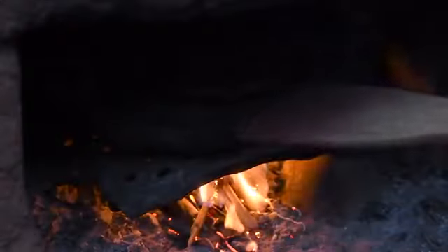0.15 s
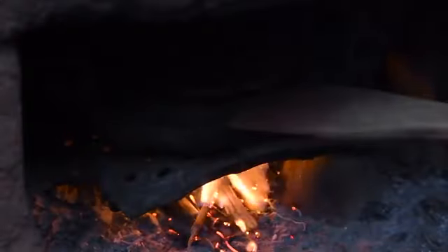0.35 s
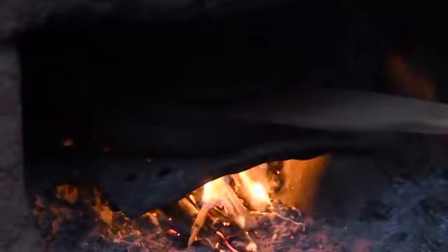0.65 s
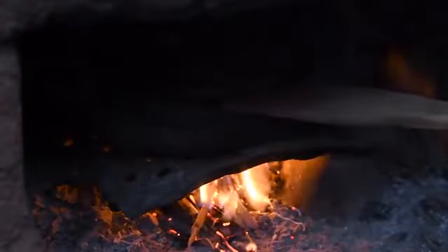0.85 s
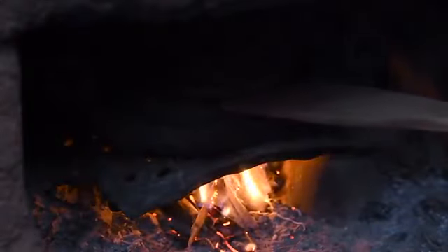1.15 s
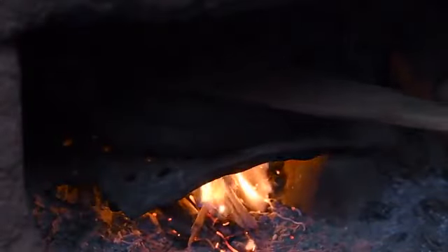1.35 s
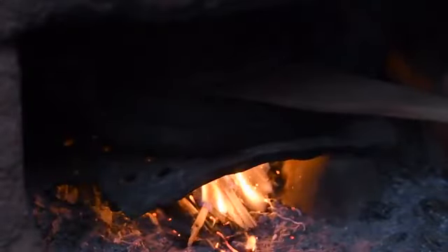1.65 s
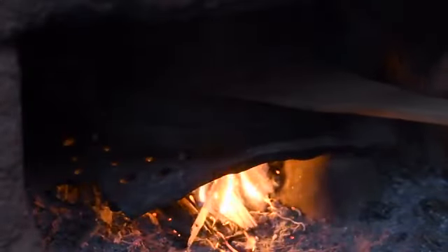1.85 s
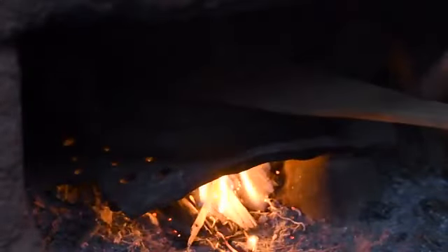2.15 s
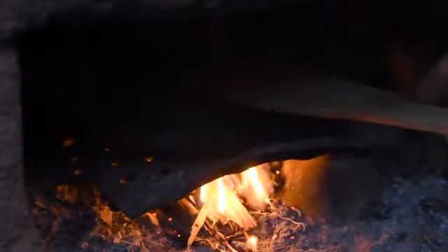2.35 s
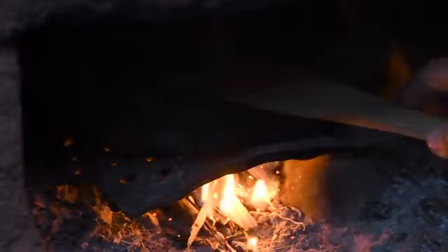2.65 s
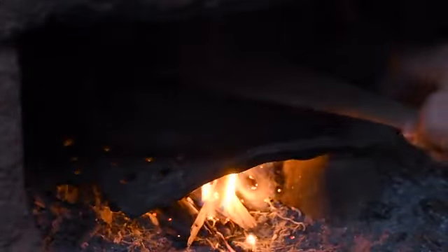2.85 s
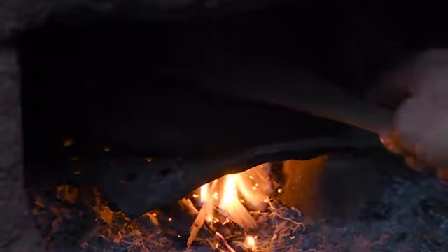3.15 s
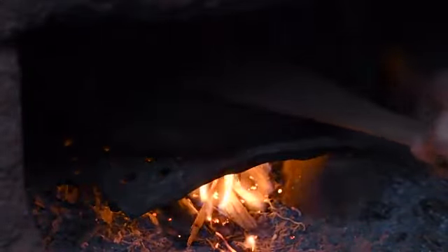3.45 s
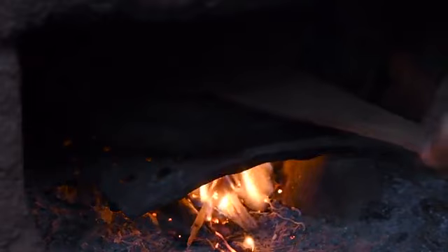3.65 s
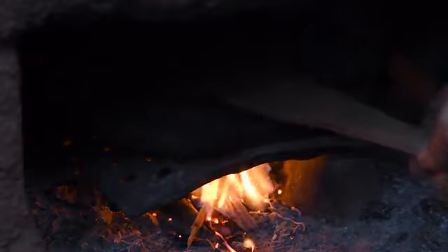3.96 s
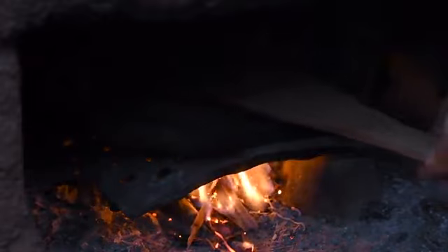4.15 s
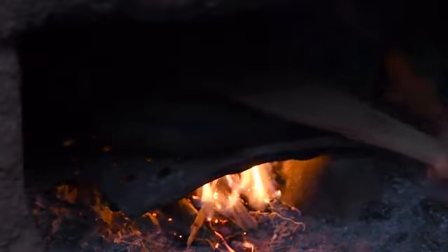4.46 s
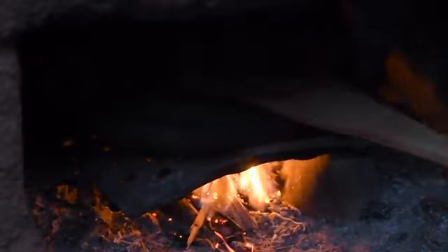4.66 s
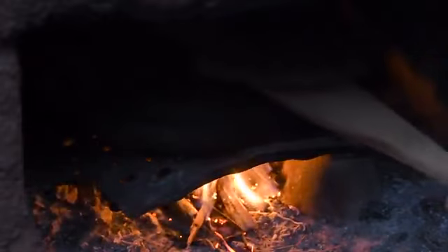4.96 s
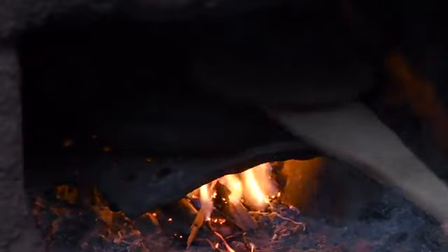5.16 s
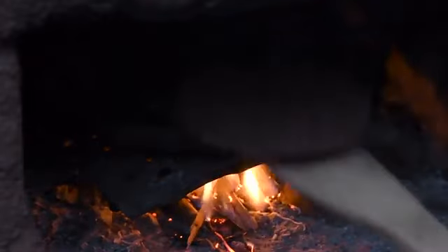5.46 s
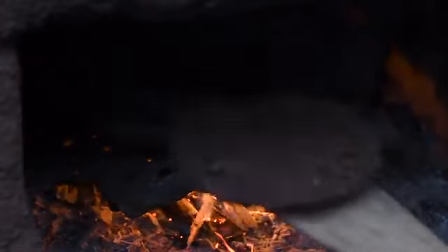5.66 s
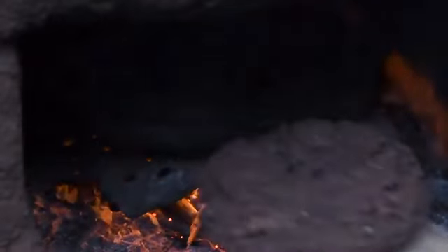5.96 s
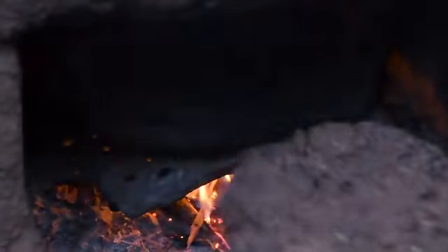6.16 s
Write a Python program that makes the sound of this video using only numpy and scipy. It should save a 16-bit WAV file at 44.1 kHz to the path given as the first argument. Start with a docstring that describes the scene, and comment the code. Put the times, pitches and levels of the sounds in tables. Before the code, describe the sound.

A constant low outdoor rumble with soft air and thin hiss lies beneath close, dry sounds of a wooden spatula on an iron griddle. Around 0.4 s comes a light scrape with a faint knock, then a sharp snap at 0.8 s. The hardest crack, with a gritty jab, lands at 1.36 s, followed by smaller catches to 1.5 s. Short jabs return at 1.9 and 2.1 s; from 2.4 to 4 s scratchy pushes come closer together, with a snap at 2.8 s and a tiny high squeak at 3.9 s. Strong quick rasps burst at 4.05-4.27 s with a dull knock, fading by 4.5 s. A faint distant engine drone climbs from 1.3 to 3.3 s; a higher, steadier one passes briefly at 4.9-5.9 s. Barely audible fire ticks fall at 4.7, 5.6 and 6.1 s, leaving rumble until about 6.3 s.

```python
"""A wooden spatula is worked under a flatbread on a hot iron griddle in a clay hearth: noise bursts through
the blade's resonances make short jabs and longer gritty scrapes, and its edge catches on baked-on crust with
sharp snaps, a brief squeak and dull griddle knocks. Decaying noise makes a few faint ticks of the wood fire.
Outdoors, filtered noise gives a steady low rumble, airy top and thin hiss; wavering sines give a far engine
drone climbing in pitch, then a shorter, higher and steadier one."""
import sys
import numpy as np
from scipy import signal
from scipy.fft import rfft, irfft, next_fast_len
from scipy.io import wavfile
from scipy.ndimage import uniform_filter1d, map_coordinates

SR = 44100
rng = np.random.default_rng(int(sys.argv[2]) if len(sys.argv) > 2 else 0)


def generate_wav(sig):
    """Save sig (samples, or channels by samples) to the path in sys.argv[1] as 16-bit PCM at SR."""
    pcm = np.round(np.clip(np.atleast_2d(sig).T, -1, 1) * 32767).astype(np.int16)
    wavfile.write(sys.argv[1], SR, pcm)


N = 278561

# Resonances that colour every scrape and snap. Each row: centre in Hz, width in Hz, lift in dB.
FIXED_MODES = [(453, 48, 5.5), (760, 69, -3), (1220, 110, 3.5), (1953, 150, 4), (3480, 140, 4),
               (3927, 81, 5.5), (5010, 83, 3.5), (7240, 170, -3), (7700, 100, 2.5), (10100, 100, 1.5),
               (11900, 150, 5)]
# Left-right likeness of the hearth sounds. Each row: frequency in Hz, coherence from 0 to 1.
NEAR_COHERENCE = [(400, 0.9), (1400, 1), (2600, 1), (4500, 0.69), (9000, 0.75), (14000, 0.92)]
RING_WIDTH_HZ = 350  # of the blade's strongest resonance


def amp(db):
    """Decibels to gain."""
    return 10 ** (np.asarray(db) / 20)


def unit(x):
    """Scale to rms 1."""
    return x / np.sqrt(np.mean(x ** 2) + 1e-20)


def along(points, hz):
    """Join (Hz, value) points on a log-frequency axis."""
    f, v = np.transpose(points)
    return np.interp(np.log(hz + 1), np.log(f + 1), v)


def curves(rows):
    """One value per sample for each column after the time."""
    s, *cols = np.transpose(rows)
    return [np.interp(np.arange(N) / SR, s, c) for c in cols]


def during(start_s, end_s, fade_s=0.0056):
    """1 between two times and 0 outside, with soft edges."""
    t = np.arange(N) / SR
    return np.clip(.5 + np.minimum(t - start_s, end_s - t) / fade_s, 0, 1)


def wobble(rate_hz):
    """A smooth random curve with rate_hz knots a second."""
    knots = rng.standard_normal(int(N * rate_hz / SR) + 4)
    return map_coordinates(knots, [np.arange(N) * rate_hz / SR])


def filtered(x, response):
    """Apply a complex response of frequency, with zero padding."""
    n = x.shape[-1]
    m = 2 * next_fast_len(n // 2 + 4096)
    return irfft(rfft(x, m) * response(np.fft.rfftfreq(m, 1 / SR)), m)[..., :n]


def causal(db):
    """Minimum-phase response with these gains: it rings only after it is struck."""
    cepstrum = irfft(np.log(amp(db)))
    half = len(cepstrum) // 2
    return np.exp(rfft(np.r_[cepstrum[0], 2 * cepstrum[1:half]], 2 * half))


def lift(modes, hz):
    """Summed gain in dB of resonances given as (Hz, width Hz, dB)."""
    return sum(db / (1 + (2 * (hz - centre) / width) ** 2) for centre, width, db in modes)


def noise_pair(n, coherence):
    """Stereo noise whose mid-side mix sets the left-right coherence."""
    def mid_side_gains(hz):
        angle = np.arccos(np.clip(along(coherence, hz), -1, 1)) / 2
        return np.array([np.cos(angle), np.sin(angle)])

    mid, side = filtered(rng.standard_normal((2, n)), mid_side_gains)
    return np.array([mid + side, mid - side])


def background(rumble_db=-44.5, swell_db=-0.13, hiss_db=-67):
    """A steady low rumble, nearly alike in both ears, with an airy top that slowly eases, under a thin hiss."""
    # Each row: frequency in Hz, density in dB per Hz.
    rumble_spectrum = [(12, -26), (22, -9.5), (38, -4.5), (60, -1.5), (120, -0.5), (160, -7), (195, -10),
                       (240, -10.5), (310, -18), (420, -26.5), (700, -36.5), (2000, -73)]
    # Each row: frequency in Hz, density in dB per Hz.
    air_spectrum = [(150, -17), (400, 5.5), (500, -2.5), (580, 3.5), (700, -0.5), (1050, -1.5),
                    (1500, -9.5), (2200, -15), (5000, -36)]
    # Each row: frequency in Hz, density in dB per Hz.
    hiss_spectrum = [(300, 12.5), (1500, 5.5), (3000, 4), (5000, 2.1), (9000, 1.5), (13000, 1), (15000, -2)]
    # Each row: time in seconds, level in dB.
    air_level = [(0, -64.5), (1.2, -64), (2.2, -64), (4, -65.5), (5, -66), (6.3, -66)]
    # Each row: frequency in Hz, coherence from 0 to 1.
    far_coherence = [(60, 0.93), (150, 0.97), (300, 0.71), (700, 0.75), (1400, 1), (4000, 0.94)]
    rumble = unit(filtered(noise_pair(N, far_coherence), lambda hz: amp(along(rumble_spectrum, hz))))
    air = unit(filtered(noise_pair(N, far_coherence), lambda hz: amp(along(air_spectrum, hz))))
    hiss = unit(filtered(rng.standard_normal((2, N)), lambda hz: amp(along(hiss_spectrum, hz))))
    rumble *= amp(rumble_db + swell_db * wobble(3.81))
    air *= amp(curves(air_level)[0])
    return rumble + air + hiss * amp(hiss_db)


def drone(rows, waver_hz=0.95, waver_db=-1.5, trim_db=-2.0):
    """Of a far engine only the firing tone carries: a sine wavering in pitch and level on its way."""
    pitch_hz, level_db = curves(rows)
    phase = 2 * np.pi * np.cumsum(pitch_hz + waver_hz * wobble(12)) / SR
    gain = amp(level_db + trim_db + waver_db * wobble(7))
    return during(rows[0][0], rows[-1][0]) * gain * np.sqrt(2) * np.sin(phase)


def fire(t60_s=0.008, trim_db=-6):
    """Tiny dry pops from the embers: noise that dies in milliseconds."""
    # Each row: start in seconds, relative level in dB.
    pops = [(4.679, -53), (5.603, -48), (6.07, -58)]
    t = np.arange(SR // 20) / SR
    out = np.zeros((2, N + SR))
    for start_s, level_db in pops:
        decay = amp(level_db + trim_db - 60 * t / t60_s)
        out[:, round(start_s * SR):][:, :len(t)] += decay * noise_pair(len(t), NEAR_COHERENCE)
    return out[:, :N]


def knocks(attack_s=.0004, scatter_db=1, trim_db=-1):
    """The flat of the blade bumps the griddle and rings its low modes, a little differently each time."""
    # Each row: start in seconds, relative level in dB.
    bumps = [(0.382, -48), (1.359, -46.5), (4.2365, -37.5)]
    # Low griddle modes, damped by the bread. Each row: frequency in Hz, relative level in dB, T60 in seconds.
    griddle_modes = [(474, -15, 0.064), (753, -4.5, 0.053), (1210, -23, 0.051), (1600, -1, 0.019),
                     (1800, -3.5, 0.031)]
    t = np.arange(SR // 6) / SR
    out = np.zeros(N + SR)
    for start_s, level_db in bumps:
        ring = np.zeros(len(t))
        for hz, mode_db, t60_s in griddle_modes:
            decay = amp(mode_db + scatter_db * rng.standard_normal() - 60 * t / t60_s)
            ring += decay * np.sin(2 * np.pi * hz * t)
        ring *= 1 - np.exp(-t / attack_s)
        out[round(start_s * SR):][:len(t)] += amp(level_db + trim_db) * ring
    return out[:N]


def squeaks(width_hz=170):
    """The edge skids and its slips lock onto one high blade mode: noise through a narrow resonance."""
    # Each row: start in seconds, end in seconds, centre in Hz, level in dB.
    skids = [(3.893, 3.92, 9500, -53)]
    out = np.zeros((2, N))
    for start_s, end_s, centre_hz, level_db in skids:
        noise = noise_pair(N, NEAR_COHERENCE)
        tone = unit(filtered(noise, lambda hz: 1 / (1 + 2j * (hz - centre_hz) / width_hz) ** 2))
        out += during(start_s, end_s) * amp(level_db) * tone
    return out


def ring_hz(s):
    """The blade's strongest resonance, which shifts with the point of contact."""
    # Each row: time in seconds, frequency in Hz.
    ring_path = [(0.47, 2660), (0.53, 2070), (1.45, 2110), (1.85, 2170), (2.12, 2720), (2.3, 1990),
                 (2.92, 1970), (2.97, 2660), (3.09, 2510), (3.18, 2980), (3.49, 2460), (3.8, 2630),
                 (3.97, 2800), (4.5, 2900)]
    return np.interp(s, *np.transpose(ring_path))


def blade_modes(s, ring_db, upper_share=0.35, scatter=0.0092):
    """Upper modes (Hz, width Hz, dB): they shift as the blade goes under the bread, and lift as it rings freely."""
    # Each row: Hz at the rim of the bread, Hz when deep under it, width in Hz, lift when damped in dB.
    upper_modes = [(3690, 4064, 130, 3.5), (5220, 4910, 176, 5), (7080, 7080, 400, 4.5),
                   (10100, 9280, 350, 3.5)]
    slide_start_s, slide_end_s = 2, 2.65
    depth = np.interp(s, [slide_start_s, slide_end_s], [0, 1])
    modes = []
    for rim_hz, deep_hz, width_hz, damped_db in upper_modes:
        seating = 1 + scatter * rng.standard_normal()  # differs from one contact to the next
        centre_hz = (rim_hz + depth * (deep_hz - rim_hz)) * seating
        modes.append((centre_hz, width_hz, damped_db + upper_share * ring_db))
    return modes


def gliding_ring(x, start_s, ring_db, patchy_db=2.5, size=512, frames=256):
    """Pass x through the blade's moving resonance; wandering contact favours ever different overtones."""
    hz, t, z = signal.stft(x, SR, nperseg=size)
    patches = uniform_filter1d(rng.standard_normal((len(hz), frames)), size=2, axis=0)
    patches = unit(uniform_filter1d(patches, size=12, axis=1))
    resonance_db = lift([(ring_hz(start_s + t), RING_WIDTH_HZ, ring_db)], hz[:, None])
    gain = amp(resonance_db + patchy_db * patches[:, :len(t)])
    return signal.istft(z * gain, SR, nperseg=size)[1][:, :x.shape[1]]


def catches(rise_s=0.00093, t60_s=0.014, tail_db=-20, tail_t60_s=0.09, ring_db=8.5, trim_db=-6):
    """The edge catches and snaps free: a crack through the blade, then the short answer of the hearth."""
    # Each row: start in seconds, relative level in dB, woody low-end lift in dB.
    snaps = [(0.3815, -38, 6), (0.7871, -39, -8), (0.8062, -21.3, -7.5), (0.8693, -39, 4),
             (0.9038, -36.5, -9), (1.3567, -13, -2.5), (1.387, -28, 4), (1.4661, -20.5, 4),
             (1.5224, -37, -1), (1.8899, -29.5, 2), (2.17, -33, 3), (2.304, -35.5, -8), (2.4427, -41, 0),
             (2.5333, -33, 4), (2.7709, -23.5, -5.5), (2.9352, -32, -8), (3.497, -34, 4),
             (3.8206, -33.5, -5), (3.842, -29.5, 9), (4.2678, -32, -12)]
    # Each row: frequency in Hz, density in dB per Hz.
    snap_spectrum = [(100, -65), (400, -10), (1350, -10), (2050, 1.5), (4000, 1), (8000, 1), (11000, 2.5),
                     (15000, -13)]
    t = np.arange(SR // 10) / SR
    shape = (1 - np.exp(-t / rise_s)) * (amp(-60 * t / t60_s) + amp(tail_db - 60 * t / tail_t60_s))
    out = np.zeros((2, N + SR))
    for start_s, level_db, woody_db in snaps:
        main_mode = (ring_hz(start_s), RING_WIDTH_HZ, ring_db)
        modes = [main_mode] + blade_modes(start_s, ring_db) + list(FIXED_MODES)
        contact = [(3000, woody_db), (7000, 0)]
        burst = noise_pair(len(t), NEAR_COHERENCE) * shape
        snap = filtered(burst, lambda hz: causal(
            along(snap_spectrum, hz) + along(contact, hz) + lift(modes, hz)))
        snap *= np.linalg.norm(shape) / np.linalg.norm(snap[0])
        out[:, round(start_s * SR):][:, :len(t)] += amp(level_db + trim_db) * snap
    return out[:, :N]


def scrapes(grit_db=2.0, judder_db=1.2, fade_db=20.5, trim_db=0.58):
    """Each push grips, holds and lets go; flickering noise stands for countless slips that ring the blade."""
    # Each row: grip time in seconds, hold in seconds, relative level in dB, swell over the hold in dB,
    # attack in seconds, release in seconds, brightness in dB, low body in dB, ring in dB.
    pushes = [(0.377, 0.1, -58.5, 7, .006, 0.053, -2.5, 7, 5), (0.531, .06, -60, -2, .025, .15, 7, 3, 3),
              (0.64, 0.16, -66.5, -1, 0.11, 0.046, 3, 5, 10),
              (0.796, 0.11, -58.5, 1.5, 0.034, 0.061, 4.5, -2, 9),
              (1.353, 0.097, -45, -6.5, 0.037, 0.043, 1.5, 3.5, 9.5),
              (1.521, 0.052, -59, 2.5, .015, 0.13, 1, 6, 5), (1.857, .02, -54.5, -2, 0.092, .1, -1, -5, 7),
              (2.115, 0.015, -41, 0.5, 0.018, 0.024, 3, -8.5, 4.5),
              (2.276, 0.021, -64, 9, 0.12, 0.026, -1, -7, -12),
              (2.37, .012, -50.5, 1, 0.052, 0.064, 4, -9, 3),
              (2.528, 0.065, -61, 2.5, 0.11, 0.11, 1, -10, 1),
              (2.721, 0.15, -55, -3.5, 0.041, 0.093, 3, -9, 8.5),
              (2.896, .075, -49.5, 4, 0.071, 0.1, 1, -5, 8),
              (3.014, .07, -53.5, 5.5, 0.088, 0.057, -1, 1, 9),
              (3.169, 0.029, -56.5, 2.5, .1, .05, -3.5, -6, 14.5),
              (3.274, .16, -59, 3, 0.046, 0.047, 2.5, -7, 11),
              (3.46, 0.044, -52.5, -0.5, 0.052, 0.03, 2, 2.5, 17),
              (3.528, 0.081, -61, 0, 0.061, .1, -1, 3, 16),
              (3.748, 0.065, -49.5, 1, 0.12, 0.047, 4, -1, 9.5),
              (3.897, .017, -54.5, 6, .04, .02, 4, -4, 19),
              (3.945, 0.095, -59.3, 0, 0.039, .03, -0.5, 6.5, 7),
              (4.042, 0.0255, -39, 6.5, 0.0045, 0.022, 3, -6, 4),
              (4.097, 0.03, -45, -2, 0.0066, 0.029, 3.5, -3, 0),
              (4.178, 0.088, -46, 6.5, 0.0062, 0.027, 2.5, -0.5, 6.5),
              (4.368, 0.12, -60.5, -7.5, 0.096, .03, -1, 3, 8)]
    # Each row: frequency in Hz, density in dB per Hz.
    friction_spectrum = [(100, -21), (350, -1.5), (750, 0), (1100, -3), (1450, -3), (2100, 2), (3500, 2.5),
                         (6000, 0.5), (9500, 0.5), (12500, -2.5), (14000, -12), (15500, -47)]
    flicker = unit(amp(grit_db * wobble(1100) + judder_db * wobble(110)))
    slips = noise_pair(N, NEAR_COHERENCE) * flicker
    out = np.zeros((2, N))
    for grip_s, hold_s, level_db, swell_db, attack_s, release_s, bright_db, body_db, ring_db in pushes:
        first = max(0, round((grip_s - 2 * attack_s) * SR))
        last = min(N, round((grip_s + hold_s + 2 * release_s) * SR))
        t = np.arange(first, last) / SR - grip_s
        # slack: distance from the hold, in attack or release times; each costs fade_db
        slack = np.maximum(-t / attack_s, 0) + np.maximum((t - hold_s) / release_s, 0)
        force_db = level_db + swell_db * (np.clip(t / hold_s, 0, 1) - .5) - fade_db * slack
        # body_db lifts or cuts the sound below about 1.2 kHz, making the rasp fuller or thinner;
        # bright_db does so at the top
        contact = [(1200, body_db), (1900, 0), (5000, 0), (10000, bright_db)]
        modes = blade_modes(grip_s, ring_db) + list(FIXED_MODES)
        crust = np.roll(slips, rng.integers(N), axis=1)[:, first:last]
        rasp = filtered(crust, lambda hz: causal(
            along(friction_spectrum, hz) + along(contact, hz) + lift(modes, hz)))
        rasp = unit(gliding_ring(rasp, first / SR, ring_db))
        out[:, first:last] += amp(force_db + trim_db) * rasp
    return out


def walls(x, echo_db=-15.5, nearest_s=0.00155, farthest_s=.011, count=9):
    """The close clay walls of the hearth send back a few weak copies, different for each ear."""
    delays_s = rng.uniform(nearest_s, farthest_s, (count, 2, 1))

    def response(hz):
        echoes = sum(np.exp(-2j * np.pi * hz * delay) for delay in delays_s) / np.sqrt(count)
        return (1 + amp(echo_db) * echoes) / np.hypot(1, amp(echo_db))

    return filtered(x, response)


def scene(lead_us=24):
    """The griddle lies just off centre, so its sound reaches the left ear a little early."""
    # Drone climbing in pitch. Each row: time in seconds, pitch in Hz, relative level in dB.
    climbing = [(1.3, 113.6, -63), (1.75, 118.8, -53), (2.12, 123.5, -47), (2.6, 136.7, -48),
                (2.85, 142.5, -49), (3.15, 147.3, -47.5), (3.32, 145, -86)]
    # Higher, steadier drone. Each row: time in seconds, pitch in Hz, relative level in dB.
    cruising = [(4.85, 264, -68), (5.05, 262, -58), (5.42, 263.3, -59.5), (5.56, 262.2, -50.5),
                (5.7, 262.5, -60), (5.9, 260, -87)]
    hearth = walls(scrapes() + squeaks() + catches() + knocks() + fire())
    # half the lead advances the left ear, half delays the right
    ear_sign = np.array([[1], [-1]])
    hearth = filtered(hearth, lambda hz: np.exp(1j * np.pi * hz * lead_us / 1e6 * ear_sign))
    return hearth + background() + drone(climbing) + drone(cruising)


def record(dry, balance_db=0.63, top_hz=15100):
    """The right microphone is more sensitive, by twice balance_db; nothing is kept from top_hz up."""
    return filtered(dry * amp([[-balance_db], [balance_db]]), lambda hz: hz < top_hz)


dry = scene()
out = record(dry)
generate_wav(out)
```